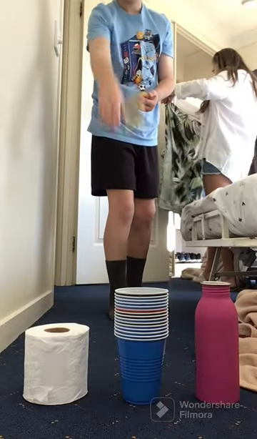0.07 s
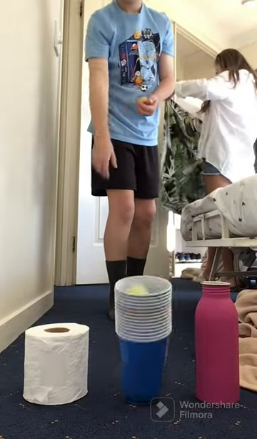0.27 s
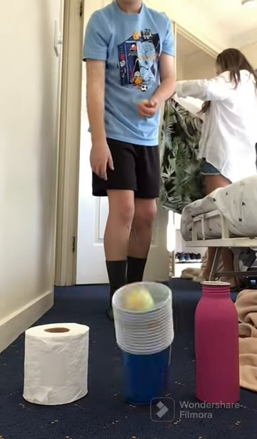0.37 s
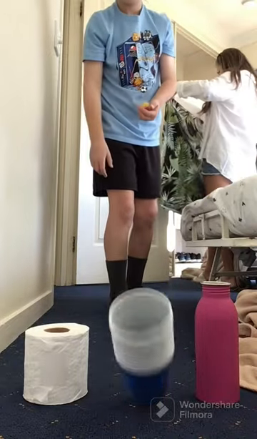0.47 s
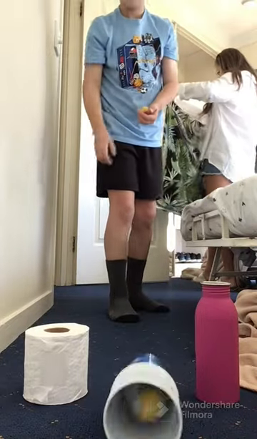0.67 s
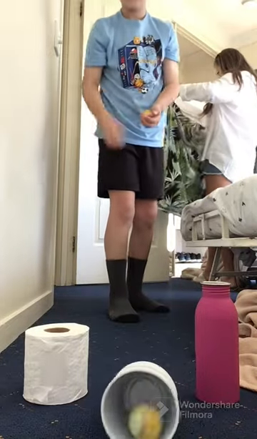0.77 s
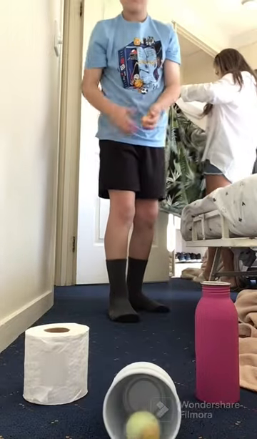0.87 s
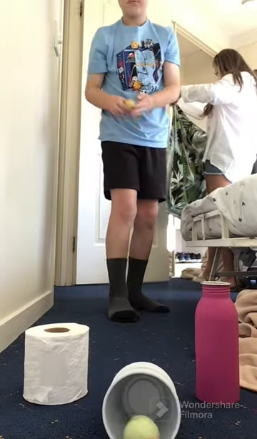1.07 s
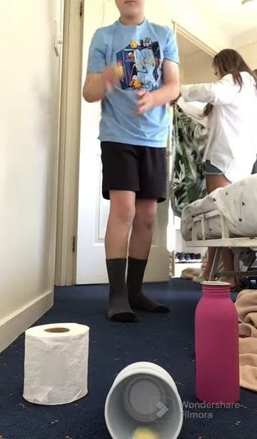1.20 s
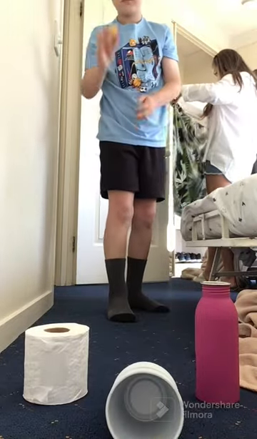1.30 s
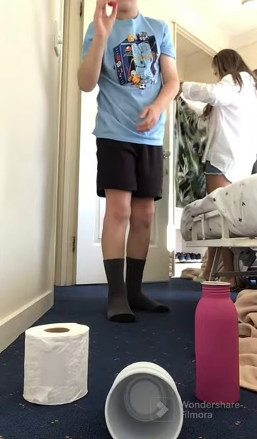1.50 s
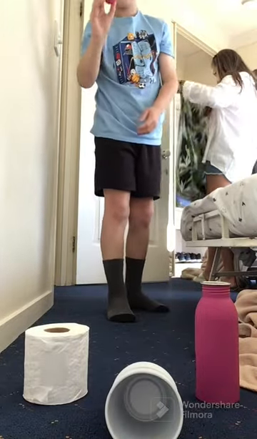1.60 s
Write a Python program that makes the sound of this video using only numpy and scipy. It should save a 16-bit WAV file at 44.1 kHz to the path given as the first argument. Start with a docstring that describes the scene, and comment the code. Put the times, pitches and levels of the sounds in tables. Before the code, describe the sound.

Close by in a quiet, faintly humming room, plastic cups are struck by a small ball, rattle, and fall over on carpet with a hollow clunk. They settle with a soft knock, among faint ticks from further off.

```python
"""A small ball knocks into a stack of nested plastic cups on carpet in a quiet, faintly humming room.
It hits at 0.23 s; the stack tips and the ball rattles inside. Near 0.66 s the cups fall over with a
hollow clunk, then settle. From 0.9 s come faint distant ticks, with one last soft knock at 1.27 s.
Each knock is a crackle of rims, a clack of the walls, a hollow pop of the air inside and a low thud."""
import sys
import numpy as np
from scipy import signal
from scipy.fft import rfft, irfft
from scipy.io import wavfile

SR = 44100
rng = np.random.default_rng(int(sys.argv[2]) if len(sys.argv) > 2 else 0)


def transcribe(u):
    """Save the signal u as a 16-bit wav file named by the first command-line argument.

    u: samples, shape (n,) or (channels, n), limited to [-1, 1]; the rate is SR.
    q: integer samples, one column per channel.
    """
    v = np.clip(np.atleast_2d(u).T, -1, 1)
    q = np.round(v * 32767).astype(np.int16)
    wavfile.write(sys.argv[1], SR, q)


N = 72765
TIME = np.arange(N) / SR


def from_db(db):
    """Decibels to gain."""
    return 10 ** (np.asarray(db) / 20)


def at_hz(points, hz, column=1):
    """A table column, interpolated over log frequency."""
    table = np.array(points)
    return np.interp(np.log(np.maximum(hz, 1)), np.log(table[:, 0]), table[:, column])


def noise(spectrum):
    """Coloured noise, rms 1."""
    gain = from_db(at_hz(spectrum, np.fft.rfftfreq(N, 1 / SR)))
    x = irfft(rfft(rng.standard_normal(N)) * gain, N)
    return x / x.std()


def band_noise(hz, octaves):
    """Band-passed white noise."""
    edges_hz = [hz / 2 ** (octaves / 2), min(hz * 2 ** (octaves / 2), SR / 2 - 100)]
    return signal.sosfilt(signal.butter(2, edges_hz, "band", fs=SR, output="sos"), rng.standard_normal(N))


def swell(start_s, rise_s, sharpness):
    """Envelope that reaches 1 after rise_s, then dies away."""
    u = np.maximum(TIME - start_s, 0) / rise_s
    return (u * np.exp(1 - u)) ** sharpness


def pulse(start_s, hz, rise_s, sharpness):
    """Heavily damped vibration of a few cycles."""
    return swell(start_s, rise_s, sharpness) * np.cos(2 * np.pi * hz * (TIME - start_s - rise_s))


def ring(start_s, modes):
    """Lightly damped modes, struck together."""
    t = np.maximum(TIME - start_s, 0)
    return sum(from_db(db - 60 * t / t60_s) * np.sin(2 * np.pi * hz * t) for hz, db, t60_s in modes)


# Room noise spectrum. Each row: frequency in Hz, relative level in dB.
AMBIENCE_SPECTRUM = [(20, -24.5), (35, -18), (50, -6), (66, 7.5), (100, 0), (135, -1), (185, -10),
                     (250, -12), (330, -14), (470, -27), (750, -20), (1200, -23.5), (1600, -22),
                     (3500, -24), (6000, -30), (9000, -29.5), (11000, -36), (16000, -36)]
# Hum tones. Each row: frequency in Hz, rms level in dB.
HUM_TONES = [(67, -55.5), (238, -66), (286, -62)]
def ambience(noise_db=-50.5):
    """Low rumble, hiss and faint hum of the quiet room."""
    hum = sum(from_db(db) * np.sqrt(2) * np.sin(2 * np.pi * (hz * TIME + rng.random()))
              for hz, db in HUM_TONES)
    return from_db(noise_db) * noise(AMBIENCE_SPECTRUM) + hum


# Echoes off nearby walls. Each row: delay in seconds, gain in dB.
ROOM_ECHOES = [(0.0113, -20), (0.019, -16.5)]
# Diffuse tail. Each row: frequency in Hz, gain in dB, T60 in seconds.
ROOM_TAIL = [(92, -1, 0.27), (213, -16.5, 0.18), (436, -6.5, 0.16), (850, -8, 0.14), (1850, -15.5, 0.21),
             (3500, -7, 0.18), (7000, -9, 0.12), (14000, -10.5, 0.23)]
def room(x, delay_s=0.0083, build_s=0.0053):
    """Two wall echoes and a diffuse tail that dies band by band."""
    t = np.maximum(TIME - delay_s, 0)
    build = 1 - np.exp(-t / build_s)
    response = np.zeros(N)
    for hz in 80 * 2 ** np.arange(0, 8, .5):
        t60_s = at_hz(ROOM_TAIL, hz, column=2)
        tail = band_noise(hz, octaves=0.44) * build * from_db(-60 * t / t60_s)
        band_share = hz * (2 ** .25 - 2 ** -.25) / (SR / 2)
        response += from_db(at_hz(ROOM_TAIL, hz)) * tail * np.sqrt(band_share / np.sum(tail ** 2))
    echoes = sum(from_db(db) * np.interp(TIME - lag_s, TIME, x) for lag_s, db in ROOM_ECHOES)
    return echoes + signal.fftconvolve(x, response)[:N]


# Distant ticks. Each row: start in seconds, level in dB, band centre in Hz.
DISTANT_TICKS = [(0.900, -56.5, 2080), (1.084, -57, 2500), (1.294, -58, 1650), (1.32, -56, 3550),
                 (1.596, -50.5, 1730)]
def distant_ticks():
    """Soft bursts of narrow-band noise from further off."""
    out = np.zeros(N)
    for start_s, db, hz in DISTANT_TICKS:
        band = band_noise(hz, octaves=.55)
        out += from_db(db) * swell(start_s, rise_s=0.0045, sharpness=0.89) * band / band.std()
    return out


# Rim crackle spectrum. Each row: frequency in Hz, relative level in dB.
RIM_SPECTRUM = [(200, -6.5), (500, 7.5), (1300, 9.5), (2400, -3), (3000, 7.5), (3600, -6.5), (4200, -0.5),
                (5100, -1.5), (6500, -2.5), (9500, -13), (13000, -7), (16000, -8.5)]
def rim_crackle(grain_db=1):
    """Slightly grainy noise of the rims; each knock takes a short burst of it."""
    grain_times_s = TIME[::16]
    grain = from_db(grain_db * np.interp(TIME, grain_times_s, rng.standard_normal(len(grain_times_s))))
    return noise(RIM_SPECTRUM) * grain / np.sqrt(np.mean(grain ** 2))


# Damped cup wall modes. Each row: frequency in Hz, relative level in dB, rise in seconds.
CLACK_MODES = [(1772, -5, .0026), (2237, -10, 0.00226), (2968, -12.5, 0.002), (3590, -21, .0014),
               (4560, -22.5, 0.0019)]
# Ringing cup wall modes. Each row: frequency in Hz, relative level in dB, T60 in seconds.
WALL_RING_MODES = [(1816, -35.5, 0.1), (1970, -34, .12), (2200, -39.5, 0.12), (2460, -42.5, .15),
                   (2480, -36.5, .14), (2880, -41.5, .14), (3620, -39.5, 0.066), (4554, -44, .14)]
def wall_clack(start_s):
    """The struck plastic walls vibrate briefly and ring on faintly."""
    clack = sum(from_db(db) * pulse(start_s, hz, rise_s, sharpness=4.5) for hz, db, rise_s in CLACK_MODES)
    return clack + ring(start_s, WALL_RING_MODES)


# Air modes in the stack. Each row: frequency in Hz, relative level in dB, T60 in seconds.
AIR_MODES = [(740, -16.5, 0.12), (817, -15, .18), (886, -18, .16), (998, -21.5, 0.16)]
def air_pop(start_s, hz, pop_db, ring_db, rise_s=0.002905):
    """The air in the cups pops hollowly and rings on from the pop's peak."""
    pop = pulse(start_s, hz, rise_s, sharpness=2.45)
    return from_db(pop_db) * pop + from_db(ring_db) * ring(start_s + rise_s, AIR_MODES)


# Thud partials. Each row: frequency ratio, relative level in dB, rise in seconds.
THUD_PARTIALS = [(1, 0.5, 0.00553), (2.1, -13.5, .0048)]
def thud(start_s, hz):
    """Low body of a knock: two heavily damped partials."""
    return sum(from_db(db) * pulse(start_s, ratio * hz, rise_s, sharpness=6.4)
               for ratio, db, rise_s in THUD_PARTIALS)


# Knocks on the cups. Each row: start in seconds, rim, wall and pop gains in dB, pop pitch in Hz,
# pop lag in seconds, air ring and thud gains in dB, thud pitch in Hz, room send in dB.
CUP_KNOCKS = [ (0.2264, -23, -21.5, -30, 686, 0.0016, -28, -16, 259, 5.5),
              (0.2383, -35, -41, -30.5, 820, 0.0021, -46, -48, 252, 14),
              (0.2487, -24.5, -2.5, -13, 820, 0.00051, -16, -8, 213, -3),
              (0.2598, -31, -23, -16, 820, 0.0004, -12.5, -32, 294, -8.5),
              (0.2670, -51, -36, -45, 790, 0.00096, -18, -49, 240, 1),
              (0.2755, -38, -28, -24, 795, 0.00024, -31.5, -35, 240, -7),
              (0.3666, -43, -44.5, -44, 960, 0.0031, -50, -31, 258, 0),
              (0.3942, -46, -45, -63, 900, 0.00065, -50, -45, 280, -8),
              (0.5242, -31.5, -30, -39, 650, 0.0014, -32, -18.5, 205, -3),
              (0.5945, -41, -47.5, -56, 950, 0.00086, -51, -47, 230, 3.5),
              (0.6447, -35, -38, -48, 900, 0.0039, -46, -25.5, 334, -21),
              (0.6498, -38.5, -37, -32.5, 933, 0.00035, -33, -52, 302, 15.5),
              (0.6598, -23, -60, -19, 1110, 0.00025, -48, -16, 352, -4.5),
              (0.6620, -29.5, -27, -12, 873, 0.00023, -20.5, -28.5, 220, -5),
              (0.6953, -32.5, -31.5, -25, 1143, 0.000083, -38.5, -31, 348, -12),
              (0.6985, -45, -60, -27, 704, 0.00012, -41, -32.5, 195, -4),
              (0.7712, -35.5, -70, -39, 800, 0.00033, -64, -33, 210, -1.5),
              (1.271, -59, -67, -58, 810, 0.0024, -60.5, -41.5, 228, 0)]
def cup_knocks():
    """Each impact excites rims, walls, air and a thud. Returns direct sound and room send."""
    rims = rim_crackle()
    direct, send = np.zeros(N), np.zeros(N)
    for start_s, rim_db, wall_db, pop_db, pop_hz, lag_s, ring_db, thud_db, thud_hz, send_db in CUP_KNOCKS:
        crackle = .5 * rims * swell(start_s, rise_s=0.0016, sharpness=0.71)
        knock = (from_db(rim_db) * crackle
                 + from_db(wall_db) * wall_clack(start_s)
                 + air_pop(start_s + lag_s, pop_hz, pop_db, ring_db)
                 + from_db(thud_db) * thud(start_s, thud_hz))
        direct += knock
        send += from_db(send_db) * knock
    return direct, send


def scene():
    """Cups close by, ticks further off, the room around them; mono."""
    knocks, send = cup_knocks()
    ticks = distant_ticks()
    return (knocks + ticks + room(send + ticks) + ambience())[None]


def record(dry, low_cut_hz=42.6, high_cut_hz=15900):
    """Drops the deep bass and cuts the top steeply."""
    thin = signal.sosfilt(signal.butter(3, low_cut_hz, "high", fs=SR, output="sos"), dry)
    return signal.sosfilt(signal.ellip(10, .1, 80, high_cut_hz, fs=SR, output="sos"), thin)


dry = scene()
out = record(dry)
transcribe(out)
```